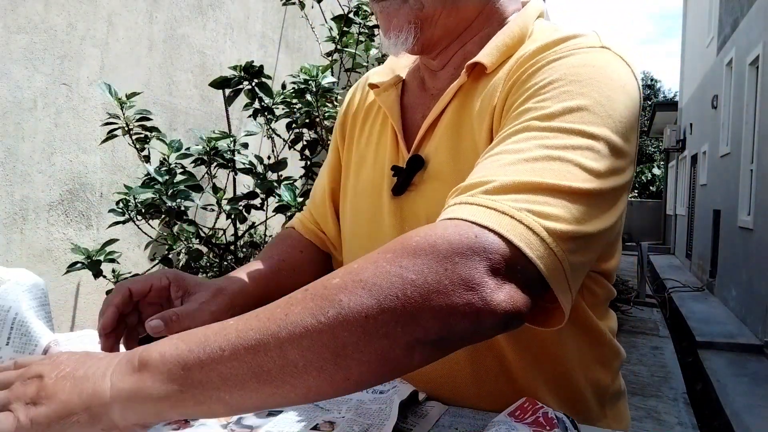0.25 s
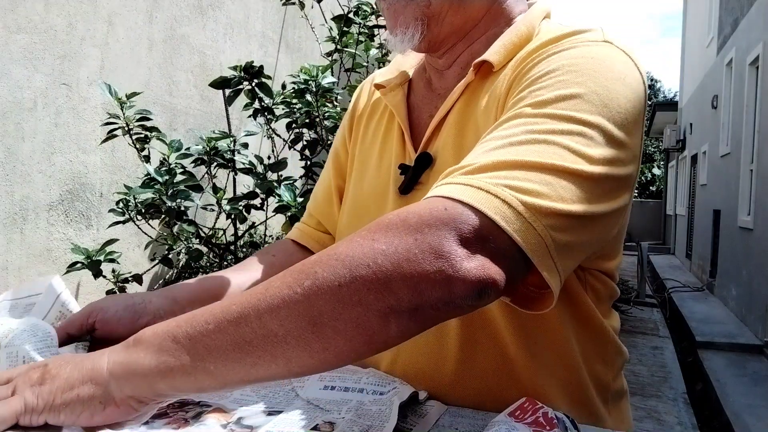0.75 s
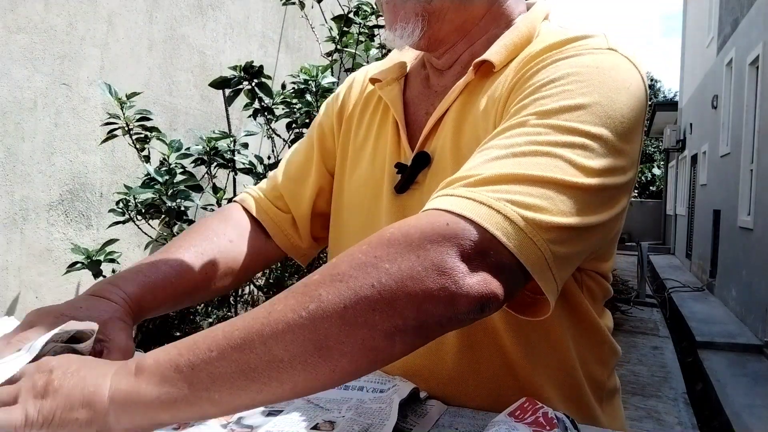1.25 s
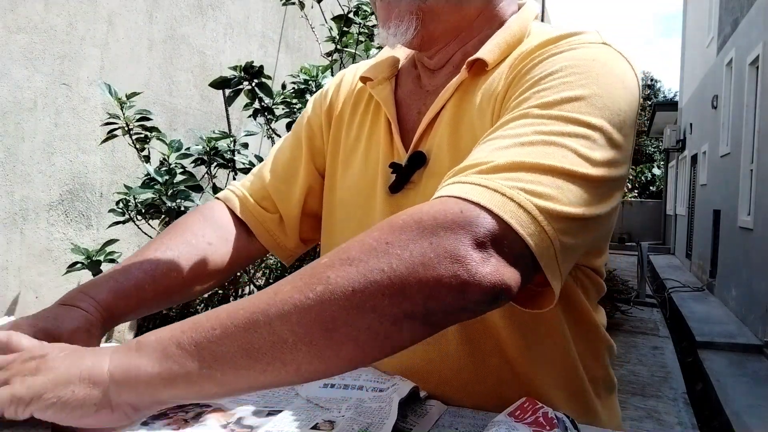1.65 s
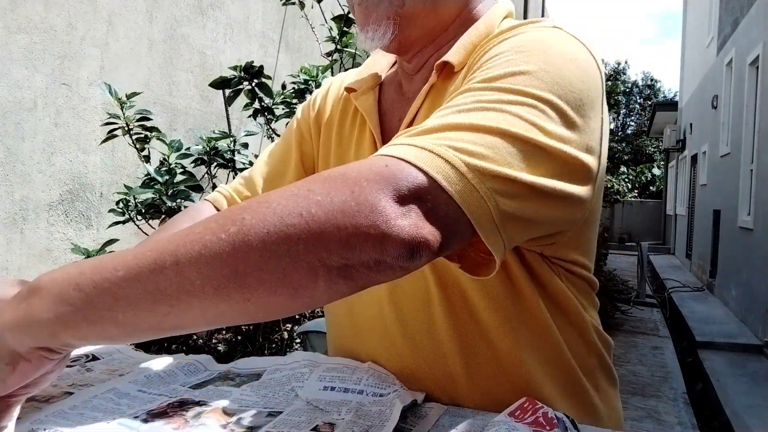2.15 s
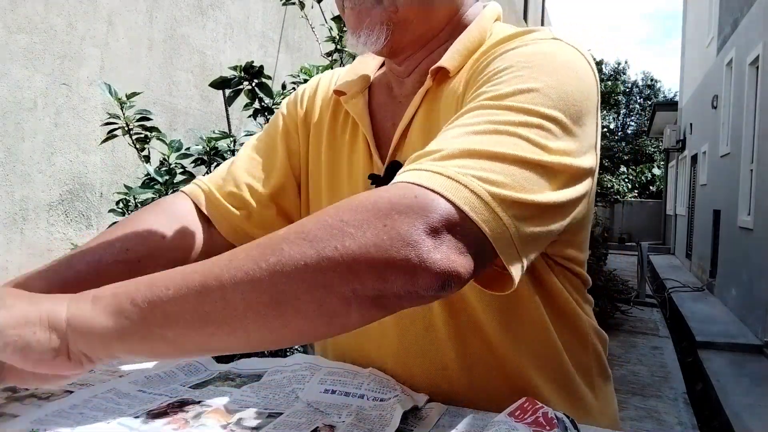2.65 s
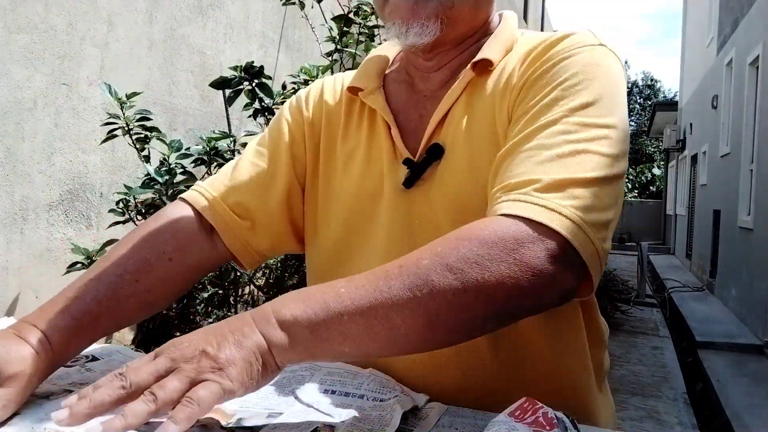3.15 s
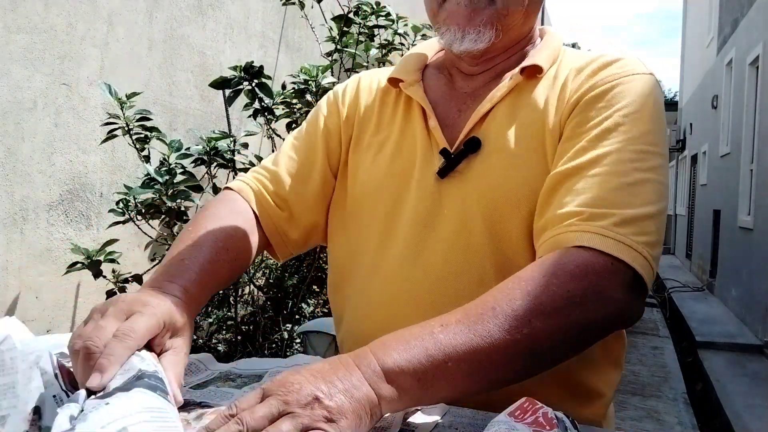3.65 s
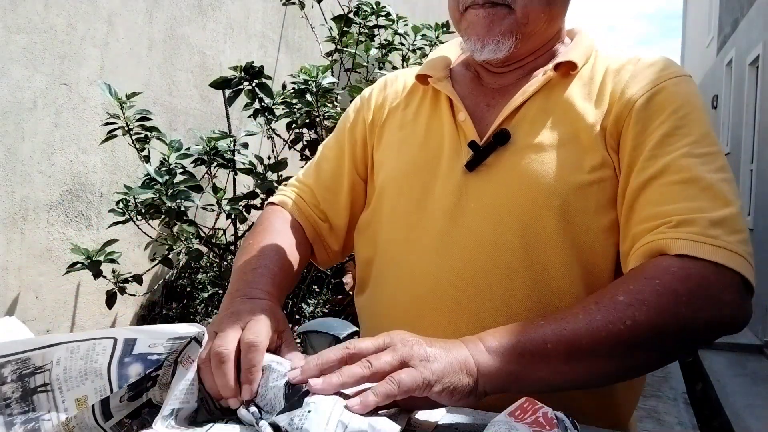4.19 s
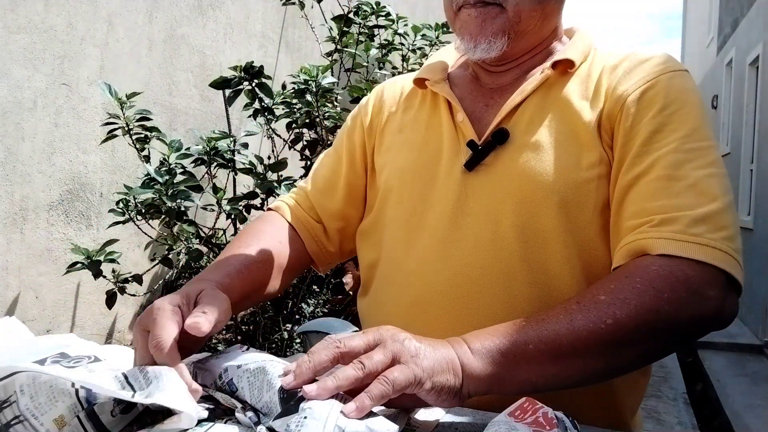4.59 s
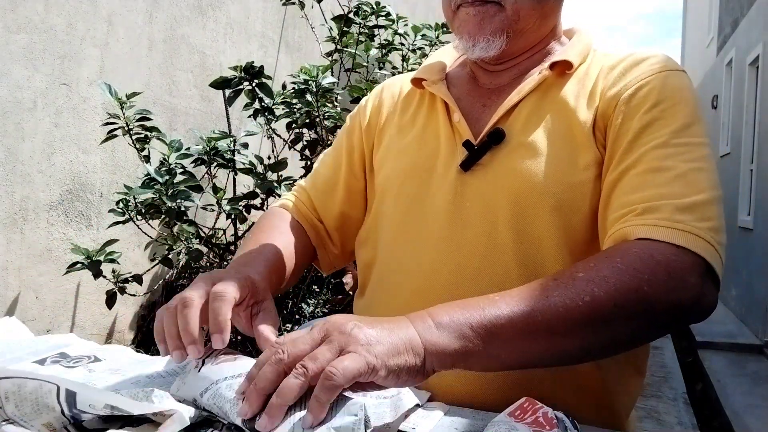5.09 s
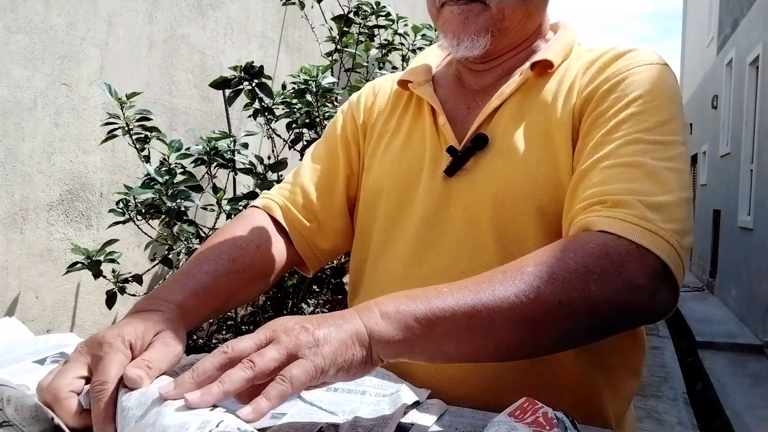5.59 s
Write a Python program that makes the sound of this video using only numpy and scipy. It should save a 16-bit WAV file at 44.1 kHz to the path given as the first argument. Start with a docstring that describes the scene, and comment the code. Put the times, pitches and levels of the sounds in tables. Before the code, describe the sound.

Newspaper sheets are crumpled and folded by hand close to the microphone, crackling crisply, with brighter snaps early and softer, lower rustling later.

```python
"""Newspaper is folded and crumpled by two hands round an object on an outdoor table, close to one microphone.
The strokes swell a steady run of creases, each a short avalanche of fibre clicks ringing a few facet modes,
with thin ridge ticks and the fine hiss of sliding sheets. Big creases snap on top, each with one mode to the
fore. At rests the rustle dips briefly. The yard adds a faint, dull echo and a bed of quiet air noise."""
import sys
import numpy as np
from scipy import signal
from scipy.fft import rfft, irfft, next_fast_len
from scipy.io import wavfile
from scipy.ndimage import map_coordinates

SR = 44100
rng = np.random.default_rng(int(sys.argv[2]) if len(sys.argv) > 2 else 0)


def int16_out(signal):
    """Quantize to a 16-bit WAV file."""
    q = np.round(np.clip(np.atleast_2d(signal).T, -1, 1) * 32767)
    wavfile.write(sys.argv[1], SR, q.astype(np.int16))


N = 257103
TIME = np.arange(N) / SR
GRAIN = 1024  # samples in one crease, tick or snap
GRAIN_HZ = np.fft.rfftfreq(GRAIN, 1 / SR) + 1  # the 1 keeps clear of zero
TOP_HZ = 16100  # upper limit of the snaps and of the recorder

# Spectral outline of newsprint as it reaches the microphone, relative levels: hz, level_db (per Hz)
NEWSPRINT = [(60, -26), (165, -19), (230, -10.5), (340, -6), (620, -1.4), (850, -4), (1600, 0.63),
             (2700, -7), (3900, -5), (5100, -12), (7200, -5), (10300, -13.5), (13300, -9.3), (15500, -0.5),
             (16400, -38.5)]


def undb(db):
    """Decibels to gain."""
    return 10 ** (np.asarray(db) / 20)


def curve(table, t):
    """The columns of a table, interpolated at the times t."""
    s, *columns = np.transpose(table)
    return [np.interp(t, s, column) for column in columns]


def unit(x):
    """Scale to rms 1 along the last axis."""
    return x / np.sqrt(np.mean(np.abs(x) ** 2, axis=-1, keepdims=True) + 1e-18)


def response(points, size):
    """Causal (minimum-phase) response with the given (Hz, dB) outline; white noise keeps its level."""
    hz, db = np.transpose(points)
    f = np.fft.rfftfreq(size, 1 / SR) + 1
    outline_db = np.interp(np.log(f), np.log(hz), db)
    cepstrum = irfft(np.log(unit(undb(outline_db))))
    # fold the cepstrum onto positive time, so that nothing sounds ahead of its cause
    cepstrum[1:size // 2] *= 2
    cepstrum[size // 2 + 1:] = 0
    return np.exp(rfft(cepstrum))


def colour(x, points):
    """Filter a sound by a (Hz, dB) outline."""
    size = 2 * next_fast_len(N // 2 + GRAIN)
    return irfft(rfft(x, size) * response(points, size))[:N]


def zones(f):
    """Weights of body, middle and crisp treble at the frequencies f; they add up to one."""
    body_edge_hz, crisp_edge_hz = 850, 5000
    body = 1 / (1 + (f / body_edge_hz) ** 4)
    crisp = 1 - 1 / (1 + (f / crisp_edge_hz) ** 6)
    return body, 1 - body - crisp, crisp


def bumps(f, peaks):
    """Gain in dB of (Hz, width Hz, dB) peaks and dips."""
    return sum(db / (1 + (2 * (f - hz) / width) ** 2) for hz, width, db in peaks)


def wander(t, per_s, f=np.zeros(1), every_hz=1):
    """Smooth chance of spread about 1, drawn per_s times a second and, over frequency, once every_hz."""
    knots = np.clip(rng.standard_normal((128, 512)), -1.8, 1.8)
    where = np.meshgrid(f / every_hz, t * per_s, indexing="ij")
    return map_coordinates(knots, where, order=2, mode="mirror")


def place(times, grains):
    """Sum grains, each centred on its time."""
    index = (times * SR).astype(int)[:, None] + np.arange(GRAIN)
    return np.bincount(index.ravel(), grains.ravel(), N + GRAIN)[GRAIN // 2:][:N]


def mode(hz):
    """Response of one damped facet mode for each frequency in hz."""
    quality = 9
    centre_hz = hz[:, None]
    return 1 / (1 + 1j * quality * (GRAIN_HZ / centre_hz - centre_hz / GRAIN_HZ))


def buckle(fall_ms, fibre_db, ring, count=4):
    """Spectra of creases giving way: a swelling, dying avalanche of fibre clicks rings the modes of a facet."""
    lowest_hz, highest_hz = 484.4, 12830
    t_ms = (np.arange(GRAIN) - GRAIN // 2) / SR * 1000
    age = t_ms / fall_ms[:, None]
    swell = np.where(age < 0, np.exp(-age ** 2 * 2.95), np.exp(1 - np.hypot(age, 1)))
    chance = rng.standard_normal((len(fall_ms), 2, GRAIN))
    fibre_size = undb(fibre_db * np.minimum(chance[:, 1], 2))
    clicks = chance[:, 0] * fibre_size * swell
    log_hz = rng.uniform(np.log(lowest_hz), np.log(highest_hz), (len(fall_ms), count))
    ringing = sum(mode(hz) for hz in np.exp(log_hz).T)
    return rfft(clicks) * (1 + ring * ringing)


def creasing(size_db, fall_ms, tilt_db):
    """Small creases give way one after another, each with its own size, length and brightness."""
    per_s = 360
    count = int(per_s * N / SR)
    times = np.clip((np.arange(count) + rng.uniform(-2, 2, count)) / per_s, 0, N / SR)
    size, length, tilt = np.clip(rng.standard_normal((count, 3)), -2, 1.5).T
    # crisp creases run on as long avalanches, dull ones pop at once
    spectra = buckle(fall_ms * undb(3 * length + 3 * tilt), fibre_db=3, ring=4)
    body, middle, crisp = zones(GRAIN_HZ)
    spectra = spectra * (body + middle + crisp * undb(tilt_db * tilt)[:, None])
    spectra = unit(spectra * response(NEWSPRINT, GRAIN))
    return unit(place(times, irfft(spectra) * undb(size_db * size)[:, None]))


def ticking(size_db):
    """Sharp little ridges flip, each a thin bright tick of random size."""
    per_s, fall_ms = 30, 1.5
    count = int(per_s * N / SR)
    times = np.clip((np.arange(count) + rng.random(count)) / per_s, 0, N / SR)
    spectra = buckle(np.full(count, fall_ms), fibre_db=0, ring=0.89)
    _, middle, crisp = zones(GRAIN_HZ)
    spectra = unit(spectra * response(NEWSPRINT, GRAIN) * (crisp + middle / 2))
    return unit(place(times, irfft(spectra) * undb(size_db * rng.random(count))[:, None]))


def sliding(grain_db):
    """Sheet rubs on sheet: countless tiny slips of uneven size."""
    slips, size = rng.standard_normal((2, N))
    return unit(colour(slips * undb(grain_db * size), NEWSPRINT))


def held(t, start, length):
    """Envelope of one stroke: the paper takes it up around its start, holds, then settles."""
    attack_s, release_s = 0.025, 0.053
    rise = np.clip((t - start) / attack_s + .5, 0, 1)
    return rise * np.exp(-np.maximum(t - start - length, 0) / release_s)


def handling(t):
    """Gains of body, middle and crisp treble: strokes add in power to light stirring, and rests shift it all."""
    # Pushes, folds and squeezes; body and crispness are relative to the middle band:
    # start_s, length_s, level_db, body_db, crisp_db
    strokes = [(0.0, 0.065, -23, 5.5, -2), (0.103, 0.15, -34, 7.5, 1), (0.386, 0.015, -36.5, 14, 5),
               (0.525, 0.42, -28.5, 3.5, -3.5), (0.564, 0.1, -27, 1, -2.5), (0.803, 0.042, -25, -8, 1),
               (0.96, 0.16, -26, 5, 2.5), (1.131, 0.29, -20.5, 3, -1), (1.464, 0.23, -25.5, 5, -2.5),
               (1.731, 0.038, -17.5, 0.5, 0.5), (1.833, 0.052, -20.5, 7, -1), (1.928, 0.11, -24.5, 7, -5.5),
               (2.105, 0.064, -25.5, 4, -2), (2.253, 0.076, -23, 2.5, -1.5), (2.364, 0.35, -23.5, 3.5, -3),
               (2.75, 0.06, -27, 6.5, -1.5), (2.88, 0.045, -28.5, 9, -2), (3.129, 0.019, -23, -5, -1.5),
               (3.23, 0.078, -32, -18, -9), (3.387, 0.061, -26, -3, -10), (3.609, 0.033, -29.5, 6.5, 3),
               (3.698, 0.37, -46, -14, 12), (4.053, 0.29, -26, -1.5, -6.5), (4.269, 0.037, -20, -1.5, -6),
               (4.6, 0.27, -27, -2, -5), (4.671, 0.074, -17.5, -1, -5.5), (4.917, 0.16, -28, -19, -7),
               (5.155, 0.15, -27, -3, -4.5), (5.39, 0.079, -22, -5, -6.5), (5.473, 0.18, -22, -1.5, -6.5),
               (5.696, 0.15, -26.5, -0.5, -3)]
    # The hands ease off or let go (one entry lifts slightly): start_s, length_s, level_change_db
    rests = [(0.276, 0.12, -3), (0.454, .06, 1), (2.019, 0.026, -8.5), (3.003, 0.027, -4),
             (3.164, 0.031, -14.5), (3.306, 0.042, -4), (3.502, 0.064, -2.5), (4.466, 0.1285, -16.5)]
    stir_db, stir_body_db, stir_crisp_db = -32.5, 1.5, -3.5
    ease_s, grip_s = 0.045, 0.0073  # letting go is slower than taking hold again
    eased_db = 0
    for start, length, change_db in rests:
        inside = np.minimum((t - start) / ease_s, (start + length - t) / grip_s)
        eased_db = eased_db + change_db * np.clip(inside + .5, 0, 1)
    power = undb([[stir_body_db], [0], [stir_crisp_db]]) ** 2 * undb(stir_db) ** 2
    for start, length, level_db, body_db, crisp_db in strokes:
        gain = undb(level_db) * held(t, start, length)
        power = power + np.outer(undb([body_db, 0, crisp_db]), gain) ** 2
    return undb(eased_db) * np.sqrt(power)


def rustle(surge_db, flash_db, tick_db):
    """Creases, ticks and sliding follow the hands; the tight wrap brings in resonances of its own."""
    # How the paper is worked: s, sliding_db (power share of the rustle, at most all of it), tightness (0-1)
    wrap = [(0, -3.5, 0), (3.25, -5, 0.1), (3.5, -6, 0.37), (3.75, -3, 1), (4.0, 4, 0.95),
            (4.12, -5.5, 0.53), (4.7, -3.5, 1), (5.1, -6.5, 0.75), (5.8, -3, 0.4)]
    # Dips and resonances of the stiff, tightly wrapped layers: hz, width_hz, gain_db (at tightness 1)
    wrap_modes = [(350, 74, 1), (1030, 610, -4), (2050, 230, 1.5), (4330, 2500, 5), (6100, 1000, -1)]
    share = np.clip(undb(curve(wrap, TIME)[0]) ** 2, 0, 1)
    creases = creasing(size_db=3.5, fall_ms=1.65, tilt_db=4.0) + undb(tick_db) * ticking(size_db=11)
    paper = np.sqrt(1 - share) * unit(creases) + np.sqrt(share) * sliding(grain_db=3.5)

    f, t, spectra = signal.stft(paper, SR, nperseg=GRAIN // 2)
    body_gain, middle_gain, crisp_gain = handling(t)
    slide_db, tight = curve(wrap, t)
    # creases come in surges, some much crisper than others; sliding is steadier
    uneven = np.sqrt(np.clip(1 - undb(slide_db) ** 2, 0, 1))
    crisp_gain = crisp_gain * undb(flash_db * uneven * wander(t, 55)[0])
    surges_db = surge_db * uneven * wander(t, 45)
    # pockets between the folds resonate, and change as the sheet deforms
    body, middle, crisp = zones(f[:, None])
    pockets_db = (1.8 + crisp) * uneven * wander(t, 35, f, 270) - .4
    wrap_db = tight * bumps(f, wrap_modes)[:, None]
    hands = body * body_gain + middle * middle_gain + crisp * crisp_gain
    spectra = spectra * undb(surges_db + pockets_db + wrap_db) * hands
    return signal.istft(spectra, SR)[1][:N]


def snaps():
    """Big creases snap through, an avalanche of clicks with one mode of the facet to the fore."""
    # The snaps; level is middle and treble with their energy taken over 5 ms, body is relative to it:
    # s, level_db, body_db, fall_ms (held to 0.4-3), facet_hz (main mode)
    snap_table = [(0.095, -23, -11, 1.6, 2570), (0.1321, -21.5, -19, 1, 1270),
                  (0.1864, -13, -12, 2.1, 15000), (0.2155, -19.5, -18, 1.7, 7950),
                  (0.4039, -21, -16, 1.8, 7440), (0.422, -21, -19, 2.1, 9100),
                  (0.6252, -19.5, -2, 0.9, 14100), (0.648, -17.5, -20, 2.5, 7240),
                  (0.7253, -18.5, -17, 2.3, 1610), (0.7788, -19.5, -31, 2.2, 1940),
                  (0.812, -18.5, -18, 2.3, 6300), (0.863, -18.5, -29, 3.2, 5550),
                  (1.1768, -15, -14, 3.6, 14100), (1.52, -21, -20, 2, 7900), (1.55, -11, -33, 3.2, 15300),
                  (1.5676, -14, -33, 1, 1860), (1.6296, -14.5, -27, 3.4, 2250),
                  (1.6588, -15, -34, 3.1, 14800), (1.7659, -12, -7, 3.2, 9500),
                  (1.8879, -15.5, -20, 1, 7240), (1.9318, -11.5, -22, 1.1, 15300),
                  (2.001, -19.5, -19, 3.5, 14000), (2.2609, -17.5, -31, 2.9, 5800),
                  (2.2995, -16, -40, 0.74, 15700), (2.342, -16.5, -12, 4.3, 5900),
                  (2.3687, -20, -6, 1.4, 6960), (2.4738, -15.5, -30, 1.6, 15100),
                  (2.7733, -17.5, -5, 1.2, 2380), (2.801, -27, -4, 2.3, 1800),
                  (2.9686, -27.5, -9, 1.6, 12300), (2.9847, -24, -7, 1.5, 3240),
                  (3.0516, -23, -10, 2, 8600), (3.14, -27, -6, 3.7, 1040), (3.229, -22.5, -34, 3.4, 1100),
                  (3.284, -18, -35, 0.56, 6840), (3.371, -24.5, -8, 2.4, 6450), (3.648, -26, -2, 3, 4500),
                  (3.9298, -26, -20, 1.1, 4900), (4.085, -20.5, -15, 0.92, 1220),
                  (4.124, -25.5, -15, 1.8, 7500), (4.1615, -17, -36, 2, 16700), (4.213, -21, -9, 1.6, 4000),
                  (4.386, -22.5, -18, 0.82, 15000), (4.413, -33.5, 6.5, 3, 460),
                  (4.4901, -26.5, -5.5, 3.2, 3730), (4.5965, -23, -16, 1.3, 3770),
                  (4.607, -23.5, -9, 2.6, 3530), (4.6565, -20.5, -22, 1, 3920),
                  (5.243, -21.5, -8, 3.6, 4300), (5.2858, -21, -14, 2, 3550), (5.619, -31, -5, 0.78, 15000)]
    times, level_db, body_db, fall_ms, facet_hz = np.transpose(snap_table)
    spectra = buckle(np.clip(fall_ms, .4, 3), fibre_db=1, ring=1)
    spectra = spectra * (1 + 2 * mode(facet_hz)) * response(NEWSPRINT, GRAIN) * (GRAIN_HZ < TOP_HZ)
    # small facets ring high and snap crisply: treble equals middle at even_hz, and rises with the mode
    even_hz, crisp_db_per_octave = 4900, 4.5
    crisp = undb(crisp_db_per_octave * np.log2(facet_hz / even_hz))
    both = np.hypot(1, crisp)
    gains = undb(level_db) * np.array([undb(body_db), 1 / both, crisp / both])
    shaped = sum(unit(spectra * weight) * gain[:, None] for weight, gain in zip(zones(GRAIN_HZ), gains))
    return place(times, irfft(shaped) * np.sqrt(.005 * SR))


def yard(x, tail_db, t60_s, dull_hz):
    """A short, dull scatter from table, walls and bushes: decaying noise, low-passed."""
    t = TIME[:SR // 2]
    tail = rng.standard_normal(len(t)) * np.exp(-np.log(1000) * t / t60_s)
    low_pass = signal.butter(1, dull_hz, fs=SR, output="sos")
    echo = signal.sosfilt(low_pass, tail / np.linalg.norm(tail))
    return x + undb(tail_db) * signal.fftconvolve(x, echo)[:N]


def scene():
    """Paper, its echo and the still air of the yard, heard alike in both channels."""
    # Spectral outline of the still air, relative levels: hz, level_db (per Hz)
    air_outline = [(25, -5.5), (100, -8), (400, 1), (900, -15.5), (3000, -76), (7000, -29), (15000, -35)]
    air_db = -54.5
    paper = rustle(surge_db=1.45, flash_db=2.5, tick_db=-8) + snaps()
    paper = yard(paper, tail_db=-14, t60_s=0.097, dull_hz=3550)
    air = undb(air_db) * colour(rng.standard_normal(N), air_outline)
    mono = paper + air
    return np.array([mono, mono])


def record(dry):
    """The microphone colours the treble; the recorder rounds the highest peaks and cuts the top."""
    # Narrow peak and dip of the microphone: hz, width_hz, gain_db
    mic_peaks = [(7960, 520, -2), (8890, 73, 8.5)]
    ceiling = .95  # of full scale
    gain = undb(bumps(np.fft.rfftfreq(2 * N, 1 / SR), mic_peaks))
    coloured = irfft(rfft(dry, 2 * N) * gain)[:, :N]
    rounded = ceiling * np.tanh(coloured / ceiling)
    return signal.sosfilt(signal.ellip(10, .2, 80, TOP_HZ, fs=SR, output="sos"), rounded)


dry = scene()
out = record(dry)
int16_out(out)
```